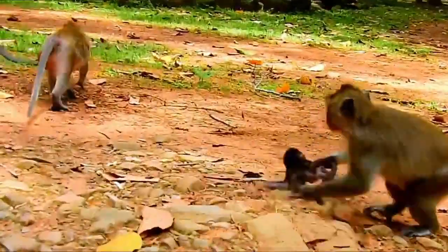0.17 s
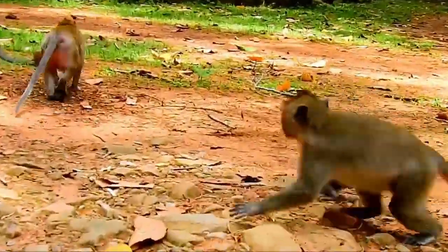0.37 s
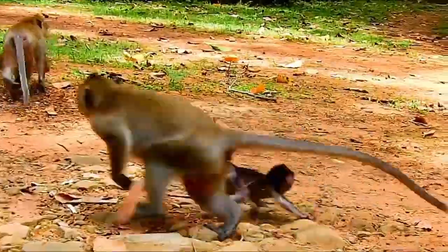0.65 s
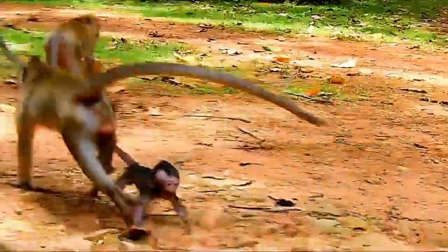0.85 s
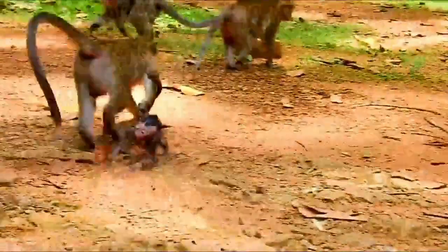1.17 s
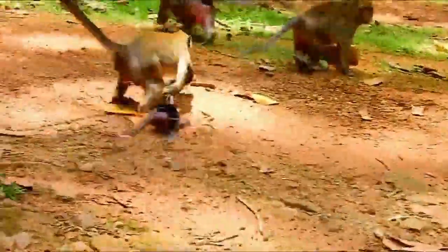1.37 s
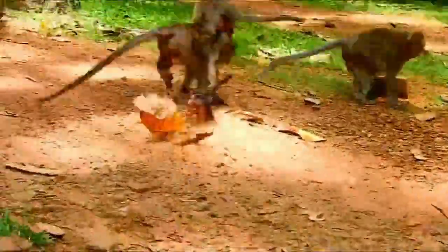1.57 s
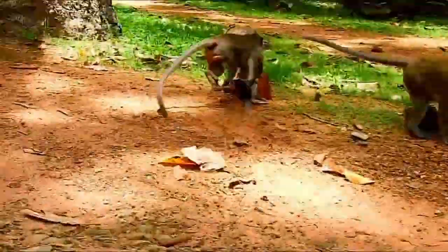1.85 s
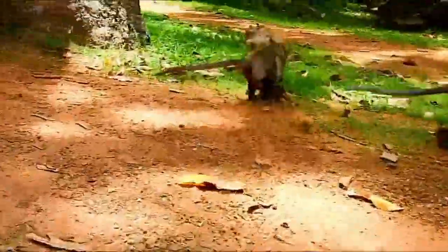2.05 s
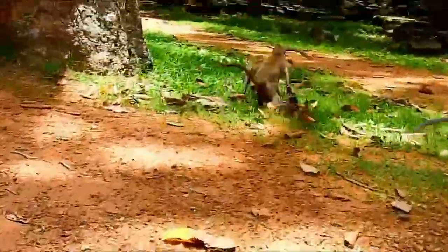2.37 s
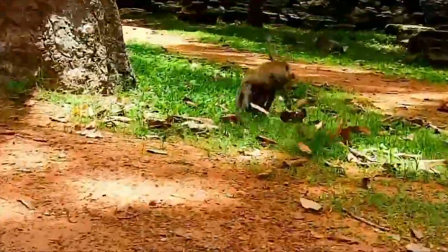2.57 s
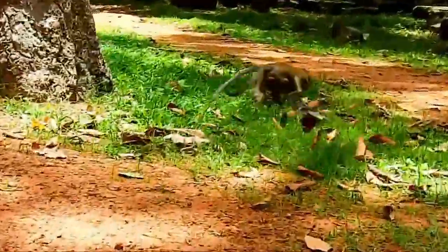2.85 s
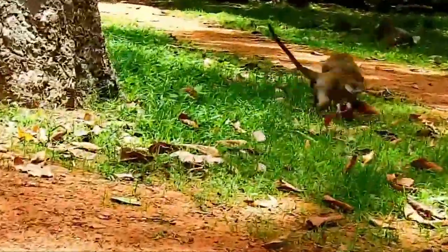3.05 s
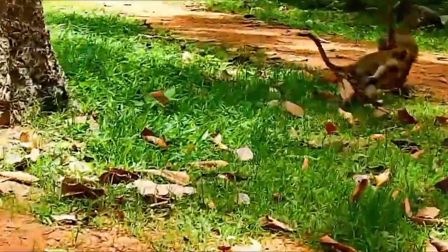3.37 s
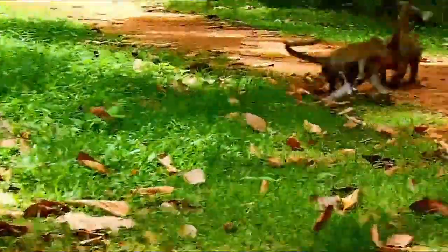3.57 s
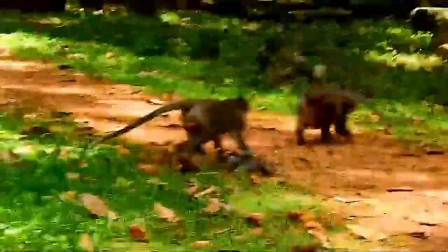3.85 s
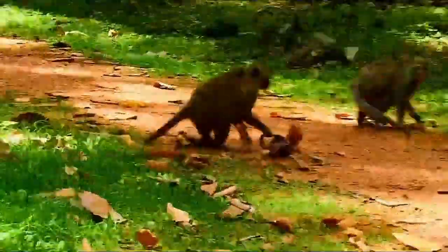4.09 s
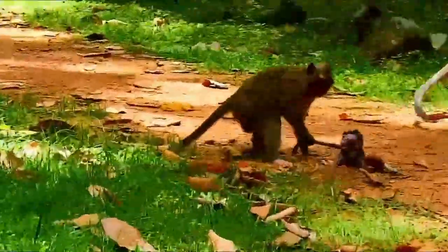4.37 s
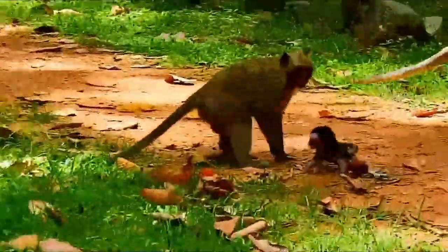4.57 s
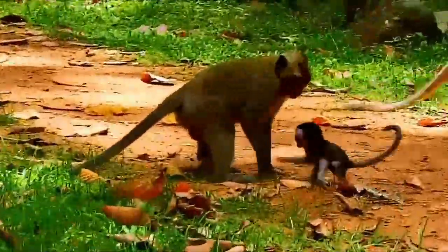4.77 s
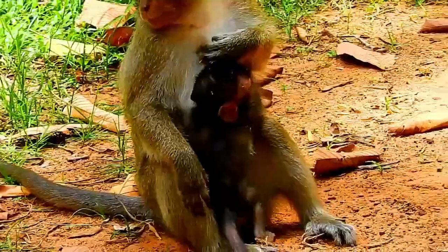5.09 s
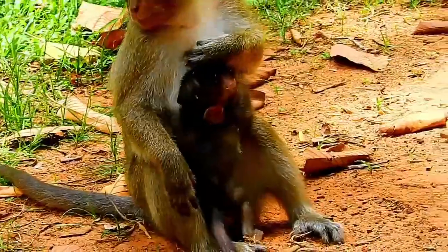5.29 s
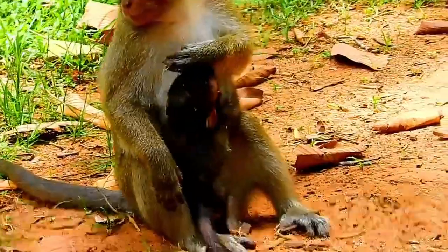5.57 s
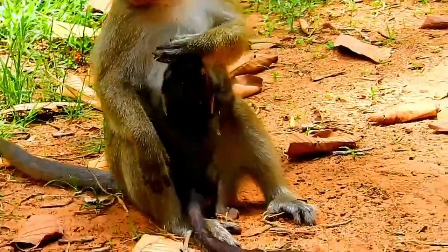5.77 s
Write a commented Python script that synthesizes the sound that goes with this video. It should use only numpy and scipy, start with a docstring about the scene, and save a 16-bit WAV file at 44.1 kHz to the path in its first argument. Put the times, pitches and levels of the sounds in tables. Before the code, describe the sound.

Shrill, strained infant monkey shrieks come in bursts, mixed with gritty scuffling and small snaps, thinning to quiet insect hiss.

```python
"""Baby monkey dragged, screaming

A baby monkey screams while an adult drags it over dry earth, leaves and grass. Its voice is a very
high whistle, split by random side tones and noise into a harsh rasp. Feet scuff as bursts of grains;
twigs snap as short damped rings. The trees throw back a soft tail of scattered echoes. Far behind lie
a motor (a wavering tone and low rumble), still air and a thin band of insect hiss, all shaped noise."""
import sys
import numpy as np
from scipy import signal
from scipy.fft import rfft, irfft, next_fast_len
from scipy.io import wavfile
from scipy.ndimage import uniform_filter1d

SR = 44100
rng = np.random.default_rng(int(sys.argv[2]) if len(sys.argv) > 2 else 0)


def store_pcm(level_fs):
    """Save levels as 16-bit WAV."""
    pcm = np.round(np.clip(level_fs, -1, 1) * 32767).astype(np.int16)
    wavfile.write(sys.argv[1], SR, np.atleast_2d(pcm).T)


N = 261513
TIME = np.arange(N) / SR

# distant motor, gain over time: [t/s, level/dB]
MOTOR_LEVEL = [(0.03, -63.5), (0.93, -75), (3.82, -68.5), (3.97, -54), (4.61, -66.5), (4.71, -55.5),
               (5.93, -74.5)]
# tone of the motor, before that gain: [f/Hz, level/dB]
MOTOR_TONES = [(130, -8)]
# spectrum shape of the motor's rumble: [f/Hz, relative level/dB]
RUMBLE_SPECTRUM = [(20, -32.5), (50, -6), (110, 4), (400, -12), (2000, -41)]
# spectrum shape of the still air: [f/Hz, relative level/dB]
AIR_SPECTRUM = [(200, -24.5), (1200, 7.5), (3600, 2), (7900, -21), (8500, -47)]
# spectrum shape of the insect hiss: [f/Hz, relative level/dB]
INSECT_SPECTRUM = [(6500, -21), (7250, 15), (7750, 12), (8400, -36.5)]
# ring of the woods, time to fall by 60 dB: [f/Hz, t60/s]
WOODS_DECAY = [(5000, 0.42), (14000, 0.037)]
# spectrum shape of dry ground under friction: [f/Hz, relative level/dB]
GROUND_SPECTRUM = [(100, -28.5), (520, -12), (850, 1), (1400, 1.5), (3200, -1), (5500, -4), (10500, -24),
                   (15500, -33)]
# loose litter stirring under the monkeys, before the litter trim: [t/s, level/dB]
LITTER_LEVEL = [(0.0, -51.5), (0.49, -106), (0.63, -64), (1.37, -64), (1.57, -43.5), (1.7, -46.5),
                (1.8, -52.5), (2.79, -66), (3.37, -50.5), (3.65, -78.5), (4.0, -56), (4.29, -55.5),
                (4.64, -57), (5.04, -62), (5.93, -66.5)]
# feet and body sliding on grit and leaves, before the scuff trim:
# [t/s, length/s, level/dB, centre f/Hz, left minus right/dB]
SCUFFS = [(0.459, 0.049, -44, 2500, 6), (0.622, .04, -39, 1380, -3.5), (.781, .015, -45, 2000, 0),
          (1.341, .025, -41.5, 2900, -2.5), (1.409, .11, -40.5, 1540, 1), (1.498, .22, -42, 3620, 1.5),
          (1.681, 0.03, -31.5, 3046, 3.5), (1.758, .025, -41.5, 1800, 3), (1.821, .06, -31, 1670, -0.5),
          (2.014, .045, -40.5, 1475, -6.5), (2.146, .034, -40.5, 2730, 7), (2.327, 0.14, -39.5, 3880, 0),
          (2.466, 0.048, -36.5, 1390, 0.5), (2.832, .055, -40, 2590, 13), (2.981, .14, -43.5, 2080, 4.5),
          (3.168, .029, -45.5, 2700, -2), (3.21, 0.029, -38, 1440, -8), (3.417, 0.066, -31.5, 1204, 1),
          (3.659, 0.024, -49.5, 1260, 6), (3.864, 0.042, -43.5, 2460, 10), (3.931, 0.023, -38, 1630, 6.5),
          (4.035, 0.024, -36.5, 2330, 2.5), (4.756, 0.15, -40, 1250, 4), (5.093, 0.052, -45.5, 6600, 10.5),
          (5.232, 0.071, -48.5, 2270, 14), (5.52, .08, -45.5, 925, 8.5), (5.781, 0.055, -45, 2550, 11)]
# pebbles knocking and twigs snapping: [t/s, peak level of the ring/dB, f/Hz]
SNAPS = [(0.5453, -28, 3116), (0.5558, -13.5, 6160), (.799, -18.5, 6000), (1.866, -19, 3040),
         (1.877, -18, 4600), (1.884, -21, 3140), (2.839, -30, 2800), (3.2849, -30, 997),
         (3.9384, -28.5, 1488), (4.3334, -30, 1127), (4.7175, -18.5, 2400), (4.719, -18, 1000),
         (4.727, -28.5, 7230), (5.776, -30, 995), (5.816, -34.5, 3300)]
# spectrum shape of the breathy rasp in the voice: [f/Hz, relative level/dB]
RASP_SPECTRUM = [(3800, -50), (5000, -9), (7000, 2.5), (10500, -15), (13000, -28), (15500, -42)]
# long screams, one curve each, before the voice trim; the last is a lower tone under the one before:
# [t/s, f/Hz, level/dB]
SCREAMS = [
    [(0.0, 6080, -17.5), (0.046, 6900, -26), (0.1, 7400, -36.5), (0.132, 7100, -24.5), (0.16, 7230, -35),
     (0.2, 5890, -31), (0.25, 6110, -33), (0.3, 8030, -40), (0.325, 7470, -42)],
    [(0.325, 7630, -32.5), (0.335, 7150, -23.5), (0.351, 6010, -24.5), (0.375, 5600, -30),
     (0.399, 6100, -25.5), (0.424, 5250, -24.5), (0.445, 5000, -19.5), (0.49, 3850, -35)],
    [(0.785, 6000, -39), (0.8, 6470, -27), (0.82, 6144, -33.5), (0.916, 6354, -25), (0.926, 6210, -18),
     (0.968, 6440, -19), (1.216, 5685, -23), (1.294, 5930, -22), (1.335, 5210, -23)],
    [(1.34, 6120, -18.5), (1.366, 5814, -19.5), (1.5, 5860, -25), (1.542, 6850, -27), (1.578, 6820, -26),
     (1.614, 5940, -27.5), (1.628, 5870, -39.5)],
    [(1.92, 6980, -47), (1.952, 8240, -40), (1.988, 7640, -45.5), (2.022, 7610, -33), (2.104, 6970, -40),
     (2.265, 7520, -42)],
    [(2.335, 7450, -45.5), (2.403, 6510, -33.5), (2.435, 6540, -30), (2.461, 7370, -37.5),
     (2.549, 8740, -57.5), (2.609, 8430, -36.5), (2.673, 7240, -40), (2.7, 7450, -50)],
    [(4.307, 5294, -36), (4.348, 5245, -23), (4.394, 4780, -31.5), (4.42, 4226, -30), (4.522, 4470, -43),
     (4.574, 3657, -34.5), (4.69, 3770, -51)],
    [(4.37, 2820, -45), (4.398, 3290, -41), (4.448, 2650, -38), (4.61, 3200, -41)],
]
# strain of each scream: [roughness 0-1 at its start, at its middle, at its end, hoarseness/dB]
STRAIN = [(.7, .5, .45, -1), (.65, .4, .05, -2), (.45, .85, .6, 0), (.75, .85, .45, -1.5), (.3, .5, .5, 5),
          (.6, .35, .35, 3), (.55, .8, .2, 2), (.65, .55, .5, -2)]
# short squeaks, yelps and upper tones over a scream, before swell, fade and the voice trim:
# [t/s, length/s, level/dB, first f/Hz, last f/Hz, roughness 0-1]
SQUEAKS = [(0.403, .05, -35, 7900, 7520, .3), (0.745, 0.031, -37, 6470, 7500, 0),
           (1.836, 0.069, -33, 5170, 5290, 0.49), (2.159, 0.04, -35, 4300, 4100, 0.45),
           (2.277, 0.03, -37, 7400, 7420, 0), (2.364, 0.11, -36, 3894, 4330, 0.82),
           (2.888, 0.017, -47.5, 6000, 5900, 0.2), (2.904, 0.081, -53, 4890, 7010, 0.55),
           (3.203, 0.078, -45, 6370, 5000, 0.64), (3.289, 0.086, -46.5, 5000, 5490, 0.36),
           (3.427, .06, -32, 8500, 8950, .45), (4.43, .17, -39.5, 8300, 8400, 0.48),
           (4.926, 0.042, -37.5, 4810, 4770, 0.57), (4.947, 0.026, -25, 4200, 3950, 0.25),
           (4.983, .04, -33, 4250, 4450, 0.2), (5.037, .021, -25, 6300, 7050, 0.84)]
# how far off the baby is, heard as more echo: [t/s, 0 near to 1 far]
DISTANCE = [(4.6, 1), (5.1, 0.57)]
# where the baby is across the stereo image: [t/s, left minus right/dB]
BEARING = [(0, 1.5), (.5, -1.5), (1.3, 4.5), (2.1, -0.5)]

EDGE_HZ = 15600  # upper band limit of the microphone
LEAF_RING_DB = 7
ROUGH_PER_DB = 0.02  # a scream clears as it weakens
SWELL, FADE = 0.39, 0.34  # shares of a squeak's length


def amp(db):
    """Decibels to gain."""
    return 10 ** (np.asarray(db) / 20)


def unit(x):
    """Scales to rms 1."""
    return x / np.sqrt(np.mean(abs(x) ** 2) + 1e-20)


def over_time(points):
    """Reads a table of times and values at every sample."""
    return np.interp(TIME, *np.transpose(points))


def read(points, hz):
    """Reads a spectrum table on a log-frequency axis."""
    f, value = np.transpose(points)
    return np.interp(np.log(hz + 1), np.log(f + 1), value)


def colour(x, db_at):
    """Filters by a function of frequency in dB; rms 1."""
    n = x.shape[-1]
    size = next_fast_len(n)
    gain = amp(db_at(np.fft.rfftfreq(size, 1 / SR)))
    return unit(irfft(rfft(x, size) * gain, size)[..., :n])


def pair(x, likeness):
    """Three unrelated rows become left and right; likeness is the shared part of their power."""
    c = np.clip(likeness, 0, 1)
    return np.sqrt(c) * x[0] + np.sqrt(1 - c) * x[1:]


def noise(spectrum, n, likeness):
    """Two channels of coloured noise, rms 1."""
    return colour(pair(rng.standard_normal((3, n)), likeness), lambda f: read(spectrum, f))


def wobble(shape, hz, order=2):
    """Random motion, rms 1, mostly slower than the given rate."""
    return colour(rng.standard_normal(shape), lambda f: -10 * np.log10(1 + (f / hz) ** (2 * order)))


def sides_of(pan_db):
    """Left and right gains for a level difference."""
    return amp(np.array([[.5], [-.5]]) * pan_db)


def add(mix, s, sound):
    """Adds a two-channel sound at time s."""
    part = mix[:, max(round(s * SR), 0):][:, :sound.shape[1]]
    part += sound[:, :part.shape[1]]


def dapple(x, depth_db, count=7, size=6):
    """Scattering off uneven ground lifts and dips patches of the spectrum as the source moves."""
    z = signal.stft(x, SR, nperseg=256, noverlap=192)[2]
    patch = np.outer(np.hanning(size), np.hanning(3 * count))  # frequency bins by time frames
    patches = unit(signal.fftconvolve(rng.standard_normal(z.shape[1:]), patch, "same"))
    dappled = signal.istft(z * amp(depth_db * patches), SR, nperseg=256, noverlap=192)[1]
    return unit(dappled[:, :x.shape[1]])


def motor(rumble_db=-2):
    """A far motor: a tone of wavering pitch over low rumble, with a level that drifts."""
    tones = 0
    for hz, db in MOTOR_TONES:
        phase = 2 * np.pi * np.cumsum(hz * (1 + 0.0237 * wobble(N, 5.04))) / SR
        tones = tones + amp(db) * np.sqrt(2) * np.sin(phase)
    rumble = amp(rumble_db) * noise(RUMBLE_SPECTRUM, N, .97)
    return (tones + rumble) * amp(over_time(MOTOR_LEVEL) + 2 * wobble(N, 10))


def still_air(air_db=-71):
    """Steady wide noise of the open air."""
    return amp(air_db) * noise(AIR_SPECTRUM, N, 0.1)


def insects(end_db=-66.5):
    """A steady narrow band of high hiss, louder at the end."""
    return amp(end_db) * noise(INSECT_SPECTRUM, N, 0.092) * np.interp(TIME, [5, 5.1], [.4, 1])


def woods(x, build_s=0.0017):
    """Scattered echoes from trunks and leaves, the treble dying first."""
    taps = pair(rng.standard_normal((3, SR)) * (rng.random((3, SR)) < 3000 / SR), 0.86)
    hz, t, z = signal.stft(taps, SR, nperseg=256)
    decay = amp(-60 * t / read(WOODS_DECAY, hz)[:, None])
    tail = signal.istft(z * decay * (1 - np.exp(-t / build_s)), SR, nperseg=256)[1]
    return signal.fftconvolve(x, tail / np.linalg.norm(tail[0]), axes=1)[:, :N]


def grit(n, per_s, spread_db, likeness):
    """Clicks of many small grains of uneven size over a smooth rub."""
    size = amp(spread_db * np.minimum(rng.exponential(1, (3, n)), 4))
    clicks = rng.choice([-1, 1], (3, n)) * size * (rng.random((3, n)) < per_s / SR)
    return pair(unit(clicks) + 0.53 * rng.standard_normal((3, n)), likeness)


def litter(litter_db=2.04, dull_db=8):
    """Continuous crackle of dry leaves and grit, stirred more or less."""
    def ground_db(f):
        """The ground spectrum with its treble dulled."""
        return read(GROUND_SPECTRUM, f) - dull_db * np.log2(1 + (f / 4500) ** 2)

    grains = dapple(colour(grit(N, 900, 2.2, 0.43), ground_db), 4.5)
    return grains * amp(litter_db + over_time(LITTER_LEVEL) + 2 * wobble(N, 18.0))


def scuff(s, length, level_db, centre_hz, pan_db, focus_db=8, rise_s=0.009, release_s=0.018):
    """A short slide: grains crackle and set a few dry leaves ringing, then settle."""
    t = np.arange(int((length + .08) * SR)) / SR
    leaves_hz = centre_hz * np.array([[.68], [1], [1.45]]) * rng.uniform(.94, 1.06, (3, 1))

    def body_db(f):
        """A broad hump around the centre, with a narrow peak for each leaf."""
        rings = (1 / (1 + ((f - leaves_hz) / (.06 * leaves_hz)) ** 2)).sum(0)
        hump_db = -focus_db * np.minimum(np.log2((f + 1) / centre_hz) ** 2, 2.4)
        return read(GROUND_SPECTRUM, f) + hump_db + LEAF_RING_DB * rings

    grains = dapple(colour(grit(len(t), 1300, 2.8, 0.45), body_db), 3.5)
    stroke = np.minimum(t / rise_s, 1) * np.exp(-np.maximum(t - length * 0.67, 0) / release_s)
    return s, amp(level_db) * sides_of(pan_db) * grains * stroke


def snap(s, peak_db, hz, ring_s=0.0014, crumble_db=-17, crumble_s=0.011):
    """A heavily damped ring of a few cycles, shorter for small things, then crumbs around its pitch."""
    t = np.arange(SR // 20) / SR
    u = t / ring_s * (hz / 1000) ** .8  # ring_s holds for a 1 kHz ring; higher ones are quicker
    channel_phase = np.array([[0], [.6]])
    ring = (u * np.exp(1 - u)) ** 2 * np.sin(2 * np.pi * hz * t + channel_phase)
    crumbs = colour(grit(len(t), 3900, 5.4, 0.39), lambda f: -33 * abs(np.log2((f + 1) / hz)))
    crumble = amp(crumble_db) * crumbs * np.minimum(u, 1) * np.exp(-t / crumble_s)
    return s, amp(peak_db) * (ring + crumble)


def throat(x, pitch_hz, below_hz=4950, follow=0.78, wall_db_per_hz=0.07):
    """The tiny throat passes little below an edge that rises and falls with the pitch."""
    f, t, z = signal.stft(x, SR, nperseg=256, noverlap=192)
    pitch = np.interp(t * SR, np.arange(len(pitch_hz)), pitch_hz)
    edge_hz = np.minimum(below_hz * (pitch / 6000) ** follow, .95 * pitch)
    gain_db = np.clip(wall_db_per_hz * (f[:, None] - edge_hz), -24, 0)
    return signal.istft(z * amp(gain_db), SR, nperseg=256, noverlap=192)[1][:, :x.shape[1]]


def fold_motion(hz, rough, split_hz=720, flutter_hz=700, open_hz=8500):
    """A slower second motion of the vocal folds throws side tones that wander, come and go."""
    n = len(hz)

    def drift(rate_hz):
        """A random complex amplitude, partly shared by both ears."""
        return pair(wobble((3, n), rate_hz, order=3) + 1j * wobble((3, n), rate_hz, order=3), 0.5)

    beat = 2 * np.pi * np.cumsum(split_hz * (1 + .25 * wobble(n, 18))) / SR
    sides = 0
    for k in range(-2, 3):
        # side tones weaken away from the whistle, and further above open_hz
        loss_db = 6 * abs(k) + (k != 0) * 0.015 * np.maximum(hz + k * split_hz - open_hz, 0)
        sides = sides + amp(3.5 * wobble(n, 20) - loss_db) * drift(110) * np.exp(1j * k * beat)
    # chaos fills the gaps between the side tones
    chaos = unit(sides + amp(-1.5) * drift(flutter_hz))
    depth = np.clip(1.7 * rough, 0, 1)
    return (np.sqrt(1 - depth ** 2) + depth * chaos) * np.exp(1j * 0.75 * wobble((2, n), 14.9))


def cry(hz, rough, hoarse_db, jitter=0.036, lurch=0.03, quaver=0.00732, rasp_db=-10,
        overtone_db_per_khz=-5.5):
    """A whistle of the vocal folds; under strain it splits into side tones and breaks into a rasp."""
    n = len(hz)
    t = np.arange(n) / SR
    rough = np.clip(rough, .17, 1)  # even the clearest cry is a little rough
    pitch = hz * (1 + jitter * rough * wobble(n, 160.6) + (quaver + lurch * rough) * wobble(n, 41.8))
    phase = 2 * np.pi * np.cumsum(pitch) / SR
    swing = fold_motion(hz, rough)
    voice = 0
    for k in range(1, 4):
        gain = amp(overtone_db_per_khz * (k - 1) * hz / 10 ** 3) * (k * hz < EDGE_HZ)
        # overtones stray k times as far, so they are hoarser than the whistle
        tone = np.sqrt(2) * abs(swing) * np.cos(k * (phase + np.angle(swing)))
        voice = voice + gain * tone
    # the rasp grows with strain
    rasp = amp(rasp_db + hoarse_db) * rough * noise(RASP_SPECTRUM, n, .5)
    voice = dapple(throat(voice + rasp, hz), 4.6)
    # the push of air stays steady while the bands shift, but the voice sputters
    power = abs(uniform_filter1d((voice ** 2).mean(0), size=400))
    voice = voice / (.1 + power) ** .4
    voice = voice * amp(2.5 * rough * wobble(n, 260))
    # the folds can swing only so far: the strongest bursts level off
    voice = unit(voice / np.sqrt(1 + abs(uniform_filter1d(voice ** 2, size=66)) / 2))
    fade = np.clip(np.minimum(t, t[-1] - t) / 0.00089, 0, 1)
    return voice * fade


def squeak(s, length, level_db, first_hz, last_hz, rough, hoarse_db=0):
    """A short cry: one glide that swells, holds and fades."""
    u = np.linspace(0, 1, int(length * SR))
    hz = first_hz + (last_hz - first_hz) * u
    envelope = np.minimum(u / SWELL, 1) * np.minimum((1 - u) / FADE, 1)
    return s, amp(level_db) * envelope * cry(hz, rough, hoarse_db)


def scream(rows, first, middle, last, hoarse_db):
    """A long cry: pitch and level follow its curve, and roughness rises where it is pushed harder."""
    s, pitch_hz, effort_db = np.transpose(rows)
    t = np.arange(s[0] - .004, s[-1] + .004, 1 / SR)
    level_db = np.interp(t, s, effort_db)
    rough = np.interp(t, np.linspace(t[0], t[-1], num=3), [first, middle, last])
    rough = rough + ROUGH_PER_DB * (level_db - level_db.mean())
    return t[0], amp(level_db) * cry(np.interp(t, s, pitch_hz), rough, hoarse_db)


def nearby(x, decay_s=0.012):
    """Quick bounces off the ground and the adult's body thicken every glide."""
    t = np.arange(SR // 20) / SR
    taps = rng.standard_normal((2, len(t))) * np.exp(-t / decay_s) * (t > .001)
    return signal.fftconvolve(x, taps / np.linalg.norm(taps[0]), axes=1)[:, :N]


def scene(voice_db=0.67, scuff_db=-1, voice_wet_db=-20, far_wet_db=7, ground_wet_db=-13):
    """The voice sways about the centre, then holds nearly central; near the end its echo thins."""
    voice, ground = np.zeros((2, 2, N))
    for row in SCUFFS:
        s, sound = scuff(*row)
        add(ground, s, amp(scuff_db) * sound)
    for row in SNAPS:
        add(ground, *snap(*row))
    for row in SQUEAKS:
        add(voice, *squeak(*row))
    for rows, strain in zip(SCREAMS, STRAIN):
        add(voice, *scream(rows, *strain))
    voice = voice + amp(-9) * nearby(voice)
    voice = voice * amp(voice_db) * sides_of(over_time(BEARING))
    voice_send = amp(voice_wet_db + far_wet_db * over_time(DISTANCE)) * voice
    echoes = woods(voice_send + amp(ground_wet_db) * ground)
    background = motor() + still_air() + insects()
    return background + echoes + litter() + ground + voice


def record(dry):
    """The microphone's band limit: a steep low-pass filter."""
    lowpass = signal.firwin(511, EDGE_HZ, window=("kaiser", 9), fs=SR)
    return signal.oaconvolve(dry, lowpass[None], "same")


dry = scene()
out = record(dry)
store_pcm(out)
```